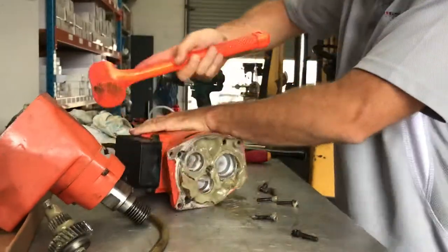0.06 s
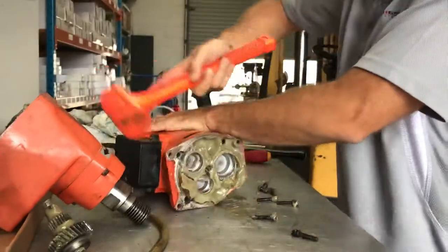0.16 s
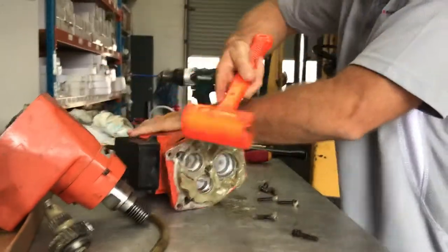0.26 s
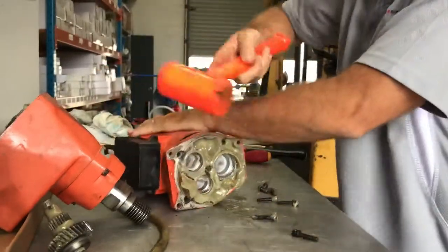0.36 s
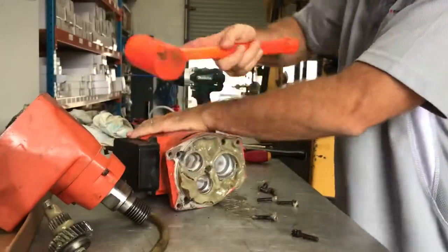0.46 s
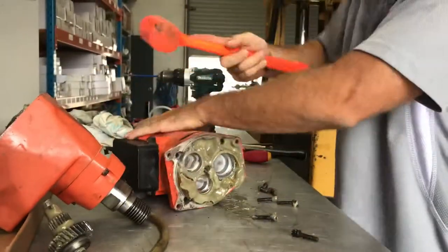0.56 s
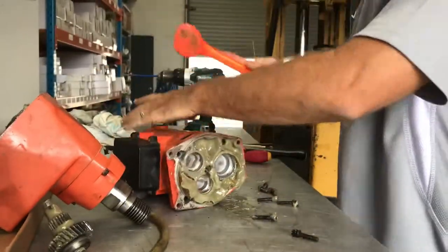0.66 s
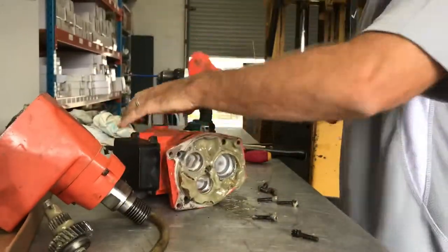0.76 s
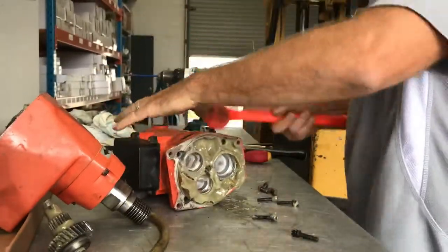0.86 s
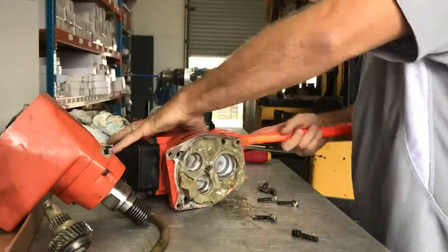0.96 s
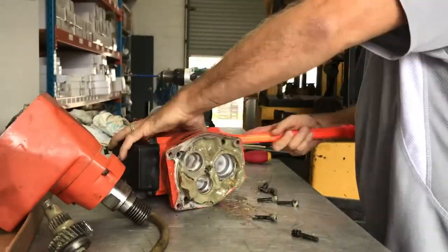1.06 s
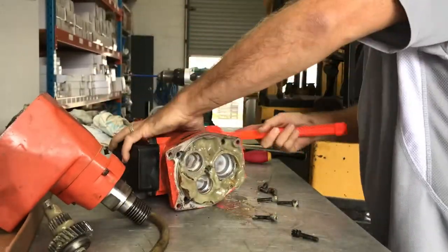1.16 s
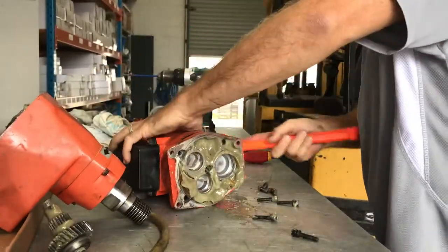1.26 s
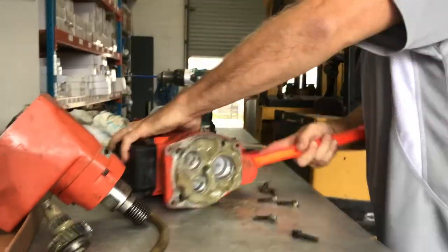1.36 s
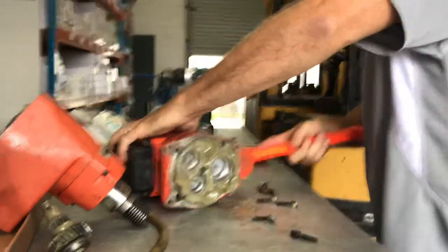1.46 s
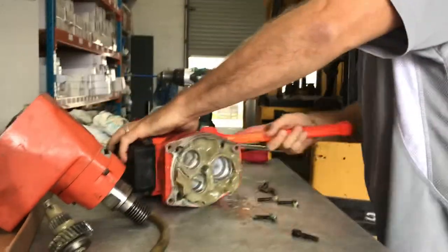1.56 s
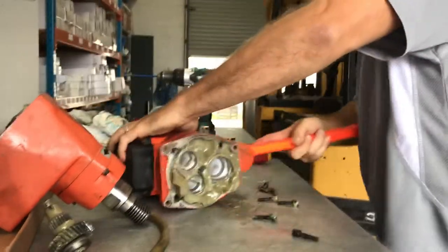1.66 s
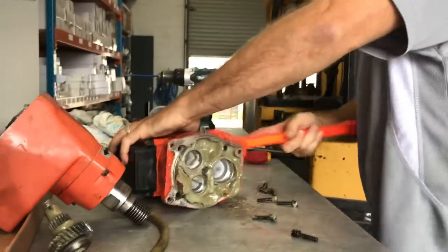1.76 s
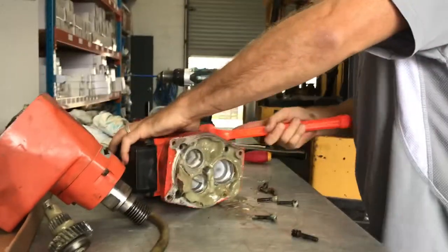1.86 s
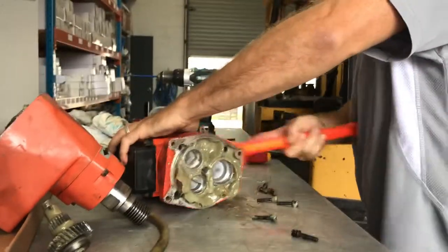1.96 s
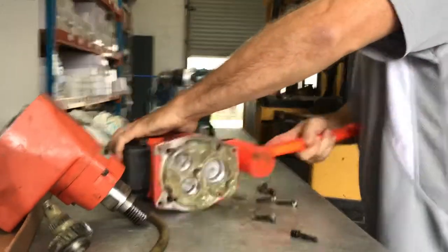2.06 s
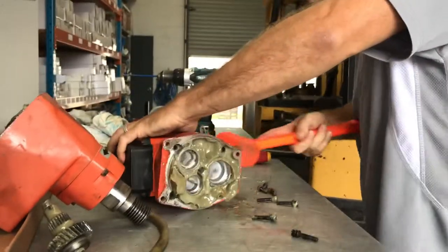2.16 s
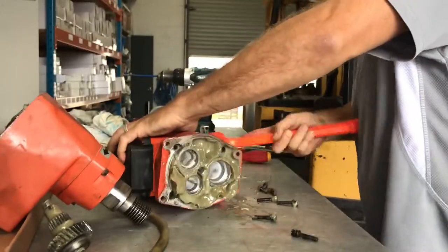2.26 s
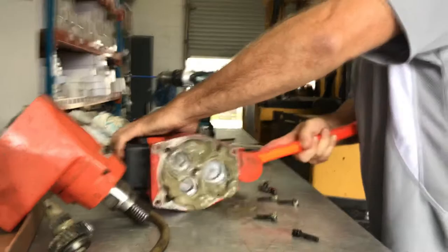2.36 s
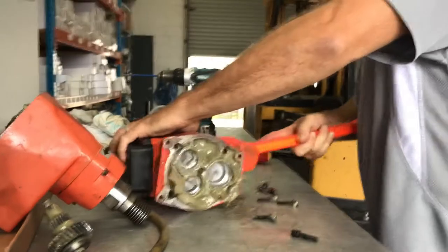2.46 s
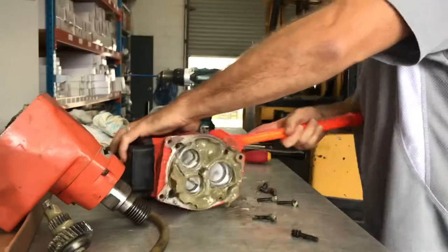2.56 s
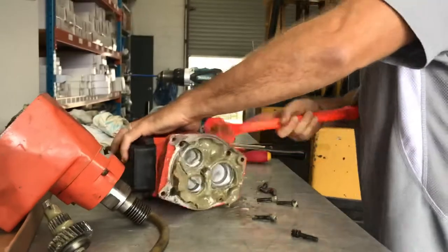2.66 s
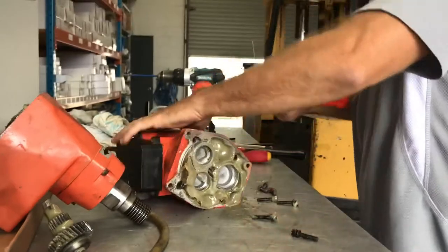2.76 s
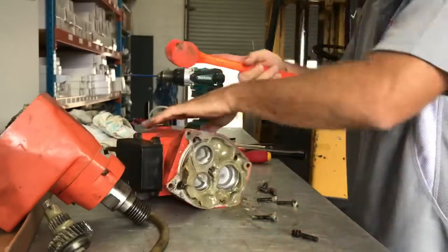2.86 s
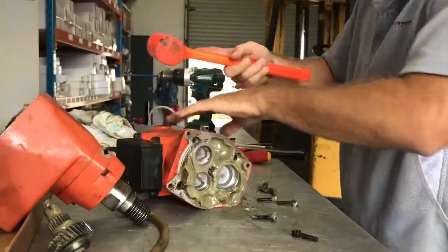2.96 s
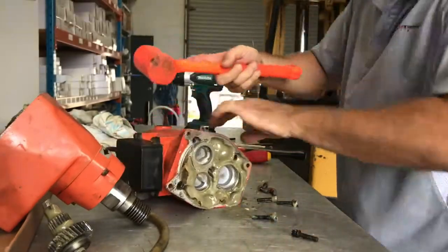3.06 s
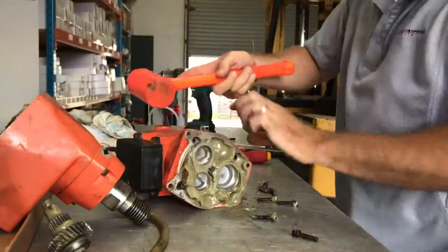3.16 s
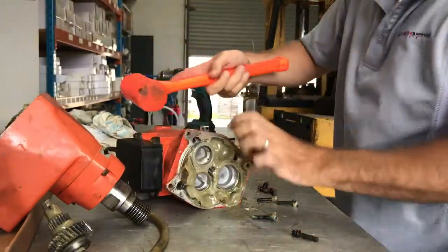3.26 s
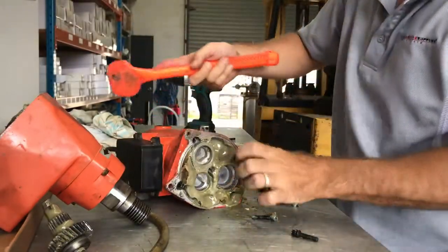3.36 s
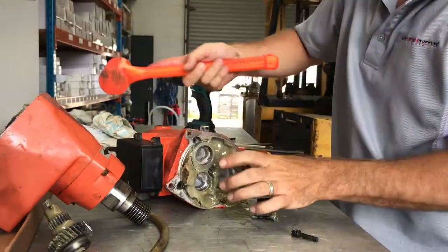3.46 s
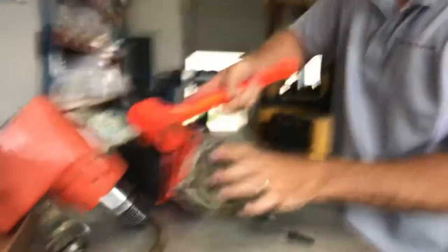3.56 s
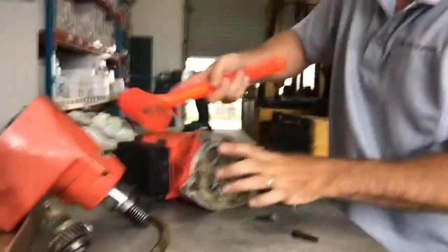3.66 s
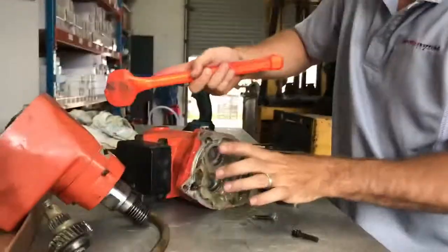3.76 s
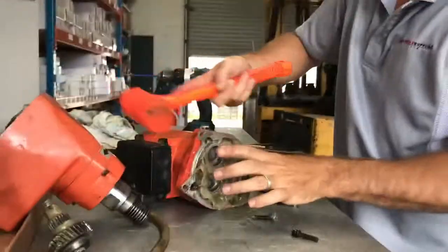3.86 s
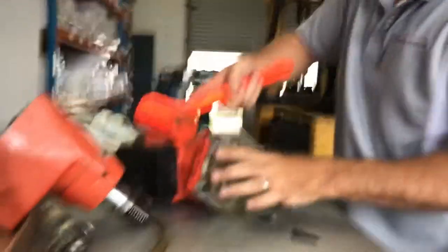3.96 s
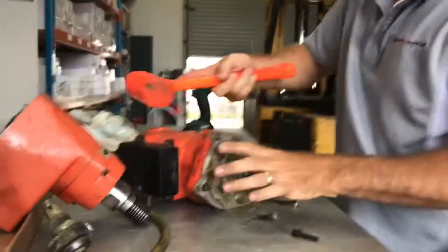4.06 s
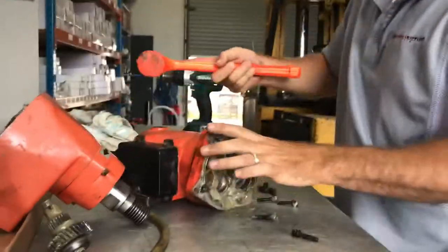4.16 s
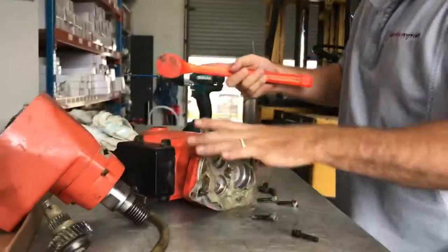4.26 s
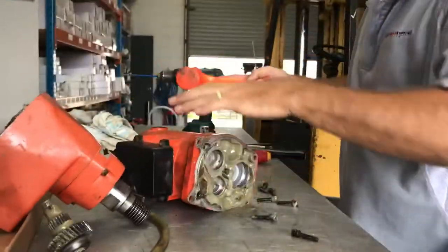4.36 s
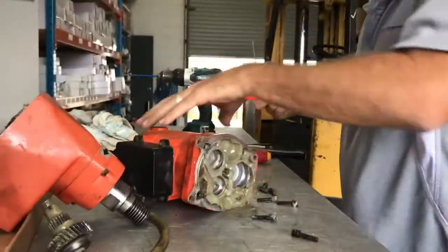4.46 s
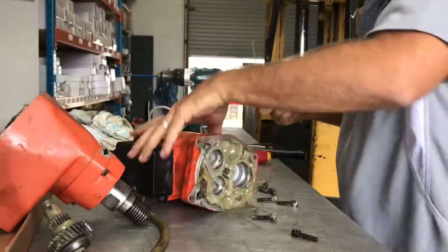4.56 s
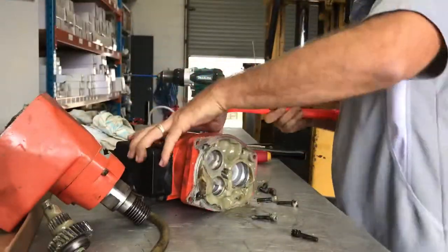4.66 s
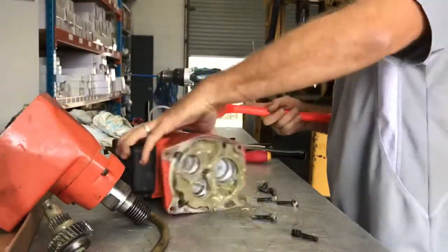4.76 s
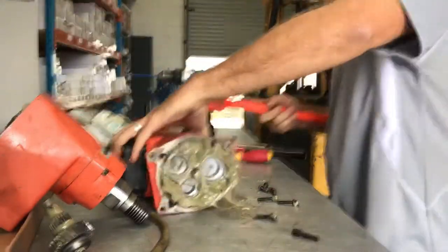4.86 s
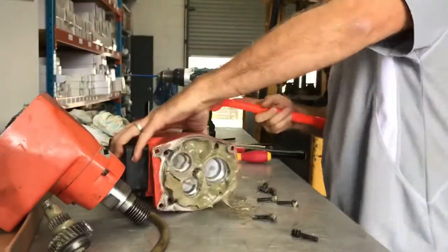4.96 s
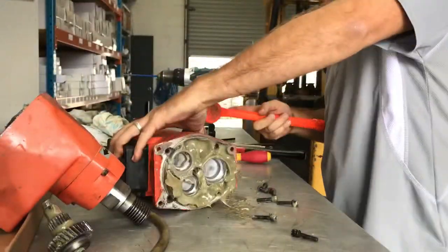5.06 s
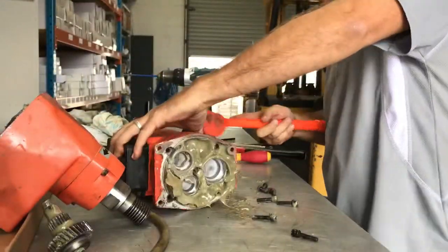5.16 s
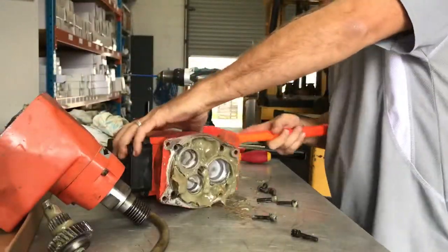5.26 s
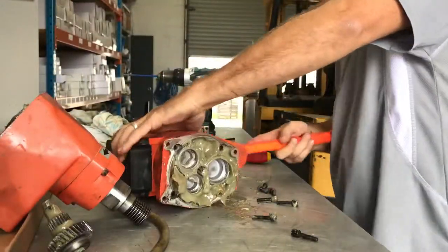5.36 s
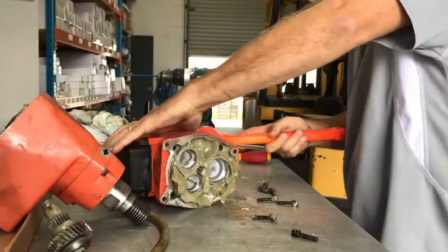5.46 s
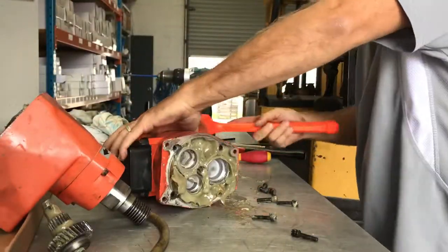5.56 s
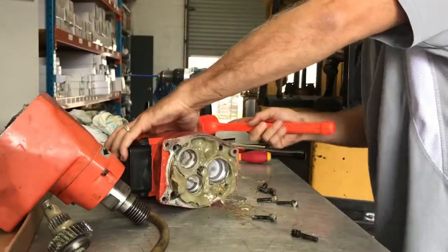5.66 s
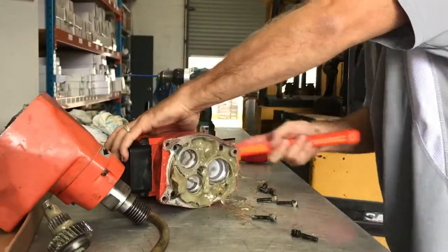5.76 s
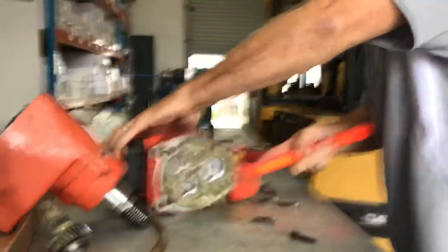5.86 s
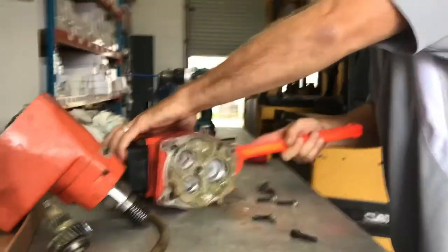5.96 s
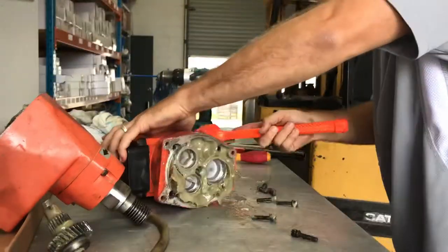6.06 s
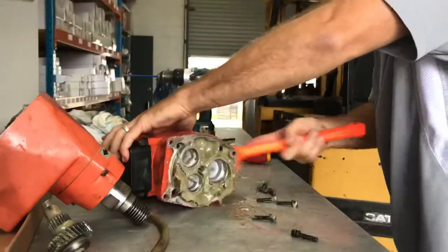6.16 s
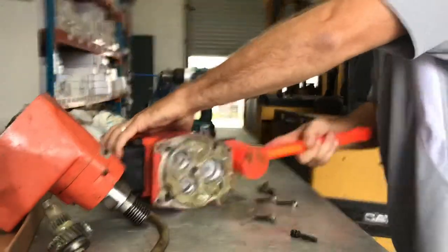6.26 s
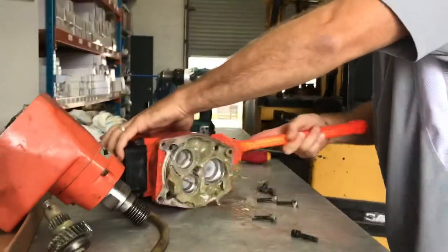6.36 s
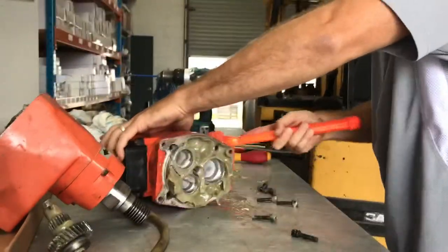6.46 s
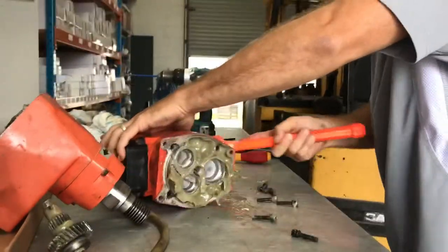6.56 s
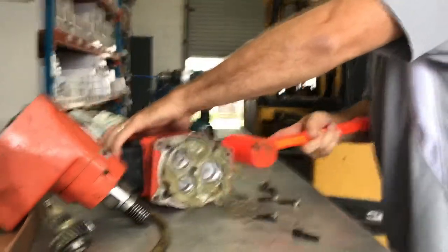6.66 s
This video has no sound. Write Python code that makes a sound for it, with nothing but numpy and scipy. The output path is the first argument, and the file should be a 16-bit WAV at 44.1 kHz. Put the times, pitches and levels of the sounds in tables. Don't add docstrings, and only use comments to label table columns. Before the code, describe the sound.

Heavy dull mallet knocks on a metal casting, each a tight double clack with bench rattle, with hand rubs between and engine drone behind.

```python
import sys
import numpy as np
from scipy import signal
from scipy.fft import rfft, irfft, next_fast_len
from scipy.io import wavfile
from scipy.ndimage import map_coordinates

SR = 44100
rng = np.random.default_rng(int(sys.argv[2]) if len(sys.argv) > 2 else 0)


def attenuation_scalar(level_db):
    decades = np.asarray(level_db, float) / 20
    return 10 ** decades


def put_to_file(sound):
    columns = np.atleast_2d(sound).T
    safe = np.clip(columns, -1, 1)
    whole_steps = np.round(safe * 32767)
    wavfile.write(sys.argv[1], SR, whole_steps.astype(np.int16))


N = 295911
LEAD = SR // 4

THUD, LOW, DULL, MID, HIGH = 400, 667, 885, 1116, 1320
# t/s, knock level/dB, crack level/dB, clatter level/dB, bench level/dB, face ring f/Hz, shot ring f/Hz
BLOWS = [(-.0127, -7.5, -19, -13.5, -18, DULL, DULL), (.2757, -8, -20, -6, -4, DULL, LOW),
         (1.4312, -13.5, -11, -14, -21.5, LOW, LOW), (1.4412, -2, -3, -12.5, -20.5, MID, DULL),
         (1.7748, -4, -1.5, -11, -15, HIGH, MID), (2.0973, -6, -1, -10.5, -10, MID, MID),
         (2.451, -4, -0.5, -14, -11.5, MID, MID), (3.6528, 0, -17.5, -1.5, -4, MID, MID),
         (4.0045, 1, -8.5, -2, -3.5, MID, LOW), (5.9163, -5.5, 1, -11, -7, HIGH, LOW),
         (6.2885, -5, 1.5, -13, -11, HIGH, LOW), (6.683, -8, 3, -12.5, -17, HIGH, LOW),
         (6.696, -5, -9, -12.5, -7.5, MID, LOW)]
# t/s, knock level/dB, clatter level/dB, ring f/Hz
ROCKS = [(.2768, -3, -30, LOW), (.2825, -9, -30, LOW), (.286, -18.5, -20, HIGH), (.291, -21, -17, LOW),
         (1.45, -7, -45, LOW), (1.4665, -4, -38, DULL), (1.7795, -9.5, -30, LOW), (1.7805, -9, -27.5, THUD),
         (1.79, -22.5, -21, LOW), (1.8076, -5, -34, DULL), (2.102, -10.5, -32, THUD),
         (2.111, -12, -16.5, THUD), (2.12, -21, -22.5, MID), (2.455, -5, -21, THUD),
         (2.4574, -2, -12.5, LOW), (2.4616, -11.5, -7, HIGH), (2.473, -16, -30, HIGH),
         (2.4765, -7, -24, DULL), (3.6538, -8, -35, LOW), (3.667, -7.5, -15.5, LOW),
         (3.673, -17, -11, DULL), (3.683, -26, -9.5, HIGH), (3.692, -30, -21, LOW), (4.0058, -8, -35, DULL),
         (4.0183, -14, -13, LOW), (4.024, -22, -16, LOW), (4.0312, -27.5, -6.5, DULL),
         (4.039, -28, -19.5, LOW), (5.933, -31, -4, HIGH), (5.937, -35, -10, HIGH), (5.946, -17, -37, HIGH),
         (6.2956, -5, -16.5, MID), (6.2974, -10, -27, THUD), (6.3005, -14, -24, MID),
         (6.304, -26, -29, LOW), (6.7015, -2, -30, THUD)]
# t/s, knock level/dB, crack level/dB, ring f/Hz
GRAZES = [(.261, -41, -35, MID), (.3195, -45, -38, LOW), (1.4282, -30, -19, MID), (1.7514, -36, -39, HIGH),
          (1.763, -33, -44, MID), (2.077, -32, -23, MID), (2.0814, -18.5, -14.5, HIGH),
          (2.083, -16, -33, THUD), (2.4275, -34, -35, HIGH), (2.44, -29, -45, HIGH),
          (2.444, -27, -39, HIGH), (5.8958, -21.5, -24, MID), (5.899, -18.5, -10, HIGH),
          (5.908, -16.5, -15, HIGH), (6.2867, -13.5, -16, MID), (6.4205, -26, -30, LOW),
          (6.6798, -17, -17, HIGH)]
# t/s, knock level/dB, ring f/Hz, crack level/dB, clatter level/dB, bench level/dB
SET_DOWN = [
    (4.9034, -25, LOW, -39, -2.5, -14),
    (4.92, -23, LOW, -22, -33, -11),
]
# start t/s, end t/s
SIDE_BLOW_SPANS = [
    (1, 3),
    (5.5, 7),
]
SHOT_KNOCK_DB = {"top": -7.5, "side": 1}
# f/Hz, bandwidth/Hz, level/dB
HOUSING_MODES = [(1181, 264, 0.5), (1610, 480, -2.5), (1887, 142, 3.5), (2070, 307, -2.5), (2574, 200, -3),
                 (2960, 250, -4.5), (3480, 1000, -10.5)]
# f/Hz, bandwidth/Hz, level/dB
BENCH_DOWN_MODES = [(130, 17.8, -2), (217.6, 30.3, -5), (271.7, 34.6, -3), (327, 76, -12.5),
                    (589, 73, -9.5)]
# f/Hz, bandwidth/Hz, level/dB
BENCH_SIDE_MODES = [(175.4, 62, -3), (216.3, 36, -3), (297, 58, -5), (400, 39, 0.5), (670.7, 33, 0.5)]
# f/Hz, level/dB per Hz
SHEET_SPECTRUM = [(300, -11.5), (480, -12), (680, 5), (900, -7), (1200, -2), (1600, -24.5), (2400, -26),
                  (4000, -50)]
# f/Hz, level/dB per Hz
CLATTER_SPECTRUM = [(880, 4), (1500, -13.5), (2240, -5), (4930, -3), (5900, 0), (8450, -6), (10500, -16.5),
                    (11800, -13), (15100, -18.5), (15900, -30.5), (16400, -53)]
# f/Hz, level/dB per Hz
TOP_SPECTRUM = [(7000, -34), (9500, -3), (11000, -4), (13000, 7), (15500, 0), (16000, -18.5), (16400, -120)]
# f/Hz, decay time T60/s
SHOP_T60 = [(100, 0.79), (500, 0.29), (1500, 0.48), (2900, 0.48), (4500, 0.32), (8000, 0.3), (15000, 0.32)]
# t/s, peak level/dB, f/Hz
SWAYS = [(0.283, -23, 66), (1.444, -20, 68.25), (1.784, -24, 53.6), (2.112, -28, 66.6),
         (2.464, -22.5, 71.8), (3.235, -26, 80.7), (3.659, -13.5, 65.5), (4.007, -14.5, 67.3),
         (4.918, -22, 62.2), (5.473, -26.5, 77.2), (5.932, -17, 67), (6.295, -20, 68.8), (6.69, -21, 64)]
# t/s, peak level/dB, length/s, lower rattle level/dB
SHOT_SLIDES = [(0.184, -36, 0.0322, -18), (0.348, -48, 0.025, -5.5), (0.775, -52, 0.045, -16),
               (1.054, -50, 0.05, -20), (1.305, -54, 0.0385, -12), (1.6782, -39, 0.029, -20),
               (1.993, -41.5, 0.033, -15), (2.36, -41, 0.0413, -17), (3.2853, -63, 0.027, -5),
               (3.518, -50, 0.038, -23), (3.8832, -37.5, 0.024, -24), (4.2665, -44, 0.039, -18),
               (4.858, -52.5, 0.03, -14), (5.787, -57, 0.047, -8), (6.174, -40.5, 0.061, -15),
               (6.581, -41.5, 0.038, -14.5)]
# f/Hz, level/dB per Hz
FINE_SHOT_SPECTRUM = [(5880, -48), (10000, -17.5), (10300, -25.5), (14100, -5), (15700, -16.5),
                      (16400, -25.5)]
# t/s, peak level/dB
TICKS = [(1.8413, -30), (2.7185, -39), (2.7334, -46), (2.7576, -39), (4.764, -38), (4.7965, -38),
         (4.815, -42), (4.8444, -35), (4.863, -38.5), (5.1564, -36), (5.31, -47), (5.328, -55.5),
         (5.384, -56), (5.47, -43)]
# t/s, length/s, level/dB
RUBS = [
    (.33, 0.055, -66),
    (0.617, 0.11, -65),
    (2.76, 0.14, -56),
    (3.494, 0.13, -58),
    (4.352, 0.076, -59),
    (4.593, 0.075, -59),
    (4.765, 0.23, -47),
    (5.305, 0.15, -56.5),
]
# f/Hz, level/dB per Hz
RUB_SPECTRUM = [(400, -27), (1000, 8), (3000, -6.5), (8000, -10.5), (11000, -16), (15500, -19),
                (16200, -120)]
# t/s, firing f/Hz, level/dB
ENGINE = [
    (0, 80.04, -31),
    (.5, 81.68, -33),
    (.9, 84.85, -33),
    (1.3, 87.24, -33),
    (1.5, 92, -40),
    (2, 97.5, -38),
    (2.5, 96, -47),
    (3.1, 99, -45.5),
    (3.35, 99, -58),
    (6.71, 98, -62),
]
# multiple of firing f, level/dB
ENGINE_ORDERS = [(0.99, 0), (4 / 3, -14.5), (1.55, -15), (0.74, -15)]
# t/s, shaft f/Hz, level/dB
TRUCK = [
    (0, 37.1, -77),
    (2.45, 37, -62),
    (2.7, 37.97, -50.5),
    (2.95, 40.04, -48),
    (3.25, 42.5, -46),
    (3.6, 45.46, -42),
    (4.1, 46.48, -45),
    (4.5, 46.55, -47),
    (4.9, 46.03, -63),
    (6.71, 46, -83.5),
]
# multiple of shaft f, level/dB
TRUCK_ORDERS = [(3, 0), (3.6, -7), (4, -6), (2.5, -6)]
# t/s, f/Hz, level/dB
HUM = [
    (0, 54.52, -35.5),
    (1.5, 56, -57),
    (2.8, 54.05, -38.5),
    (3.2, 56.26, -43),
    (3.5, 57.54, -55),
    (6.71, 55.8, -54),
]
# t/s, level/dB
WHINE_LEVEL = [(0, -60), (.15, -58), (.5, -57.5), (.7, -54), (1, -55.5), (1.4, -61), (1.6, -69), (2.4, -74),
               (3.1, -87), (6.71, -120)]
# multiple, level/dB, level change while coasting/dB per s
WHINE_ORDERS = [(.5, -8, -11), (1, 0, 0), (1.5, -21, 5.5), (2, -14, -1), (3, -31, 6)]
# f/Hz, start t/s, end t/s, level/dB
FAN_TONES = [
    (1120, 0, 6.71, -69),
    (1168, 0, 6.71, -69),
    (1362, 4.6, 6.3, -65),
    (4888, 3.35, 3.7, -72),
    (4199, 5, 5.8, -82),
]
# t/s, level/dB
TRAFFIC = [(0.0, -32.5), (0.49, -43), (1.23, -35), (2.34, -40), (2.75, -38), (3.96, -38.5), (4.67, -42),
           (4.88, -41), (5.12, -39), (5.49, -41), (6.09, -36.5), (6.71, -39)]
# t/s, level/dB
BUSTLE = [(0.0, -57), (1.12, -59), (1.42, -61), (2.04, -55.5), (2.24, -60), (2.6, -51.5), (2.86, -63),
          (3.36, -62), (3.91, -57), (4.43, -61), (4.82, -61), (4.97, -53.5), (5.64, -64.5), (5.9, -63),
          (6.09, -59), (6.71, -58.5)]
# f/Hz, level/dB per Hz
RUMBLE_SPECTRUM = [(15, -34.5), (25, -25), (49, 5), (65, 8.5), (81, -0.5), (120, -4.5), (160, -46),
                   (260, -120)]
# f/Hz, level/dB per Hz
DRONE_SPECTRUM = [(50, -26), (85, 3.5), (107, -5), (167, -10), (243, -21), (317, -26.5), (420, -24.5),
                  (550, -48.5), (920, -120)]
# f/Hz, level/dB per Hz
NOISE_SPECTRUM = [(180, 2.5), (300, 0.5), (476, -9.5), (565, -6.5), (689, -6.5), (747, -9.5), (1060, -8.5),
                  (1130, -13), (1320, -11), (1480, -16), (2600, -26.5), (3380, -30), (5720, -120)]
# f/Hz, level/dB per Hz
HISS_SPECTRUM = [(1000, -29.5), (1700, -4), (1910, -8.5), (2040, -5), (3870, -7.5), (4150, -9),
                 (4470, -9.5), (5620, -12), (10500, -21.5), (13600, -39), (22000, -120)]

SHOT_CRACK_DB, FACE_CLATTER_DB = -6.5, -7
SHOT_LAG_S, LAG_S_PER_DB, LEAST_LAG_S = 0.005596, .0004, 0.00329
ROCK_CRACK_DB, ROCK_BENCH_DB, ROCK_FADE_DB_PER_S = -4, -3, 147
GRAZE_CLATTER_DB, GRAZE_BENCH_DB = -7, 0.5
RING_SCATTER = .01
STRIKE_DB, STRIKE_S = 6, .0003
SWAY_T60_S, TICK_S = 0.21, .004
WHINE_HZ, WHINE_DROP_HZ, COAST_S, COAST_BEND = 4325, 770, .56, 1.45
FAR_T60_S, FAR_WET_DB = 1.3, -1.5
RUMBLE_DB, DRONE_DB = -2, -5.5
NOISE_DB, HISS_DB, TOP_DB = 11, 0.04, -14
NOISE_FOLLOWS, TOP_FOLLOWS = 0.41, 0.94


def unit(x):
    return x / np.sqrt(np.mean(x ** 2) + 1e-20)


def along(points, hz):
    f, v = np.transpose(points)
    return np.interp(np.log(hz + 1), np.log(f + 1), v)


def curves(rows):
    s, *cols = np.transpose(rows)
    return [np.interp(np.arange(N) / SR, s, c) for c in cols]


def wobble(rate):
    knots = rng.standard_normal(int(N * rate / SR) + 4)
    return map_coordinates(knots, [np.arange(N) * rate / SR])


def filtered(x, response):
    m = next_fast_len(len(x) + SR // 2)
    return irfft(rfft(x, m) * response(np.fft.rfftfreq(m, 1 / SR)), m)[:len(x)]


def coloured(spectrum, size=N):
    return unit(filtered(rng.standard_normal(size), lambda hz: attenuation_scalar(along(spectrum, hz))))


def modes(peaks):
    def response(f):
        total = 0
        for k, (centre, width, db) in enumerate(peaks):
            damping = 1j * f * width
            total = total + (-1) ** k * attenuation_scalar(db) * damping / (centre * centre - f * f + damping)
        return total
    return response


def add(track, s, sound):
    part = track[LEAD + round(s * SR):][:len(sound)]
    part += sound[:len(part)]


def swell(t, length):
    return (1 - np.exp(-t / (0.036 * length))) * np.exp(-t / length)


def hump(t, length, power):
    return np.sin(np.pi * np.clip(t / length, 0, 1)) ** power


def is_sideways(s):
    return any(a < s < b for a, b in SIDE_BLOW_SPANS)


def contacts():
    rows = list(SET_DOWN)
    for s, db, crack_db, clatter_db, bench_db, face_hz, shot_hz in BLOWS:
        rows.append((s, db, face_hz, crack_db, clatter_db + FACE_CLATTER_DB, bench_db))
        shot_s = s + max(LEAST_LAG_S, SHOT_LAG_S + LAG_S_PER_DB * db)
        shot_db = db + SHOT_KNOCK_DB["side" if is_sideways(s) else "top"]
        rows.append((shot_s, shot_db, shot_hz, crack_db + SHOT_CRACK_DB, clatter_db, bench_db))
    for s, db, clatter_db, hz in ROCKS:
        blow = max(row for row in BLOWS if row[0] < s)
        bench_db = blow[4] + ROCK_BENCH_DB - ROCK_FADE_DB_PER_S * (s - blow[0])
        rows.append((s, db, hz, (db + clatter_db) / 2 + ROCK_CRACK_DB, clatter_db, bench_db))
    for s, db, crack_db, hz in GRAZES:
        rows.append((s, db, hz, crack_db, crack_db + GRAZE_CLATTER_DB, db + GRAZE_BENCH_DB))
    return rows


def blows():
    size = N + LEAD
    ring, knock, chatter, snap, bright, slam, down, side = np.zeros((8, size))
    t = np.arange(SR // 20) / SR
    for s, db, hz, crack_db, clatter_db, bench_db in contacts():
        hz = hz * (1 + RING_SCATTER * rng.standard_normal())
        held = hump(t, 0.0047, 0.55) + 0.3 * swell(t, 0.0035)
        add(ring, s, attenuation_scalar(db - 5.5) * held * np.sin(2 * np.pi * hz * t))
        add(knock, s, attenuation_scalar(db - 5.5) * swell(t, 0.0027))
        add(slam, s, attenuation_scalar(clatter_db - 35.0) * swell(t, 0.012))
        add(chatter, s, attenuation_scalar(crack_db + 6.5) * swell(t, 0.0034))
        add(snap, s, attenuation_scalar(crack_db + STRIKE_DB) * hump(t, STRIKE_S, 1))
        add(bright, s, attenuation_scalar(clatter_db - 5) * swell(t, 0.0027))
        push = side if is_sideways(s) else down
        add(push, s, attenuation_scalar(bench_db + 13.0) * hump(t, 0.0012, 1))
    casting = filtered(chatter * rng.standard_normal(size) + snap, modes(HOUSING_MODES))
    clinks = attenuation_scalar(2.7 * rng.standard_normal(size // 30 + 1)).repeat(30)[:size]
    steel = bright * clinks * coloured(CLATTER_SPECTRUM, size=size)
    bench = filtered(down, modes(BENCH_DOWN_MODES)) + filtered(side, modes(BENCH_SIDE_MODES))
    rest = casting + steel + bench + slam * coloured(TOP_SPECTRUM, size=size)
    sheet = knock * coloured(SHEET_SPECTRUM, size=size)
    room = workshop(attenuation_scalar(-11) * ring + sheet + rest)
    return (ring + rest + attenuation_scalar(-9.5) * room)[LEAD:]


def workshop(x):
    hz, t, z = signal.stft(rng.standard_normal((40, SR // 3)), SR, nperseg=256)
    late = attenuation_scalar(-60 * t / along(SHOP_T60, hz)[:, None])
    scatter = attenuation_scalar(3.5 - 60 * t / 0.061)
    tails = signal.istft(z * (late + scatter), SR, nperseg=256)[1]
    tails = tails * (1 - np.exp(-np.arange(tails.shape[1]) / SR / 0.0015))
    wet = np.zeros(len(x) + SR)
    step = SR // 300
    for k, start in enumerate(range(0, len(x), step)):
        part, tail = x[start:start + step], tails[k % len(tails)]
        if np.abs(part).max() > 2e-3:
            echo = signal.fftconvolve(part, tail / np.linalg.norm(tail))
            wet[start:start + len(echo)] += echo
    return wet[:len(x)]


def sways():
    track, t = np.zeros(N + LEAD), np.arange(SR // 2) / SR
    for s, db, hz in SWAYS:
        envelope = attenuation_scalar(db + 11.5 - 60 * t / SWAY_T60_S) * (1 - np.exp(-t / 0.023))
        add(track, s, envelope * np.sin(2 * np.pi * hz * t))
    return track[LEAD:]


def grains():
    return attenuation_scalar(2.5 * rng.standard_normal(N // 20 + 1)).repeat(20)[:N]


def shot():
    fine, coarse, ticks = np.zeros((3, N + LEAD))
    t = np.arange(SR // 4) / SR
    for s, db, length, low_db in SHOT_SLIDES:
        pour = hump(t, 1.6 * length, 1 / 3) * np.exp(-t / 0.044)
        add(fine, s - .006, attenuation_scalar(db - 10.5) * pour)
        add(coarse, s + 0.0083, attenuation_scalar(db + low_db + 1.5) * pour)
    for s, db in TICKS:
        add(ticks, s, attenuation_scalar(db - 13.5) * swell(t, TICK_S))
    low = coloured([(2500, -27.5), (4500, 7.5), (9500, 6.5), (12000, -37.5), (16000, -120)])
    click = coloured([(3000, -40.5), (7000, 0.5), (10000, 0), (14000, 3.5), (15800, 6.5), (16400, -120)])
    hiss = fine[LEAD:] * grains() * coloured(FINE_SHOT_SPECTRUM)
    rattle = coarse[LEAD:] * grains() * low
    return hiss + rattle + ticks[LEAD:] * click


def rubs():
    level, t = np.zeros(N + LEAD), np.arange(SR // 2) / SR
    for s, length, db in RUBS:
        add(level, s, attenuation_scalar(db) * hump(t, length, 0.53))
    return level[LEAD:] * attenuation_scalar(1.5 * wobble(84)) * coloured(RUB_SPECTRUM)


def machine(rows, orders, drift, drift_rate, flutter_db, flutter_rate):
    hz, db = curves(rows)
    turn = 2 * np.pi * np.cumsum(hz * (1 + drift * wobble(drift_rate))) / SR
    lines = sum(attenuation_scalar(level + flutter_db * wobble(flutter_rate)) * np.sin(k * turn) for k, level in orders)
    return np.sqrt(2) * attenuation_scalar(db) * lines


def engines():
    engine = machine(ENGINE, ENGINE_ORDERS, 0.01918, 12, 1.77, 14)
    truck = machine(TRUCK, TRUCK_ORDERS, .015, 11, 3.5, 7)
    hum = machine(HUM, [(0.984, 0.0006)], 0.022, 8, 1.3, 5.6)
    return engine + truck + hum


def whine():
    t = np.arange(N) / SR
    hz = WHINE_HZ + WHINE_DROP_HZ * np.exp(-(t / COAST_S) ** COAST_BEND)
    coasting = np.transpose([t, hz, *curves(WHINE_LEVEL)])
    orders = [(k, db + change * np.minimum(t, 1.5)) for k, db, change in WHINE_ORDERS]
    return far(machine(coasting, orders, .009, 400, 3.5, 90))


def far(x):
    t = np.arange(SR // 2) / SR
    tail = rng.standard_normal(len(t)) * attenuation_scalar(-60 * t / FAR_T60_S)
    return x + attenuation_scalar(FAR_WET_DB) * signal.fftconvolve(x, tail / np.linalg.norm(tail))[:N]


def fans():
    total = np.zeros(N)
    for hz, a, b, db in FAN_TONES:
        rows = [(a - .2, hz, db - 30), (a, hz, db), (b, hz, db), (b + .2, hz, db - 40)]
        total += machine(rows, [(1, 0)], .003, 90, 2, 25)
    return total


def background():
    (street_db,), (shop_db,) = curves(TRAFFIC), curves(BUSTLE)
    calm_db = shop_db.mean()
    swing_db = shop_db - calm_db
    rumble = attenuation_scalar(street_db + RUMBLE_DB + 1.9 * wobble(2.6)) * coloured(RUMBLE_SPECTRUM)
    drone = attenuation_scalar(street_db + DRONE_DB + 2.2 * wobble(8.8)) * coloured(DRONE_SPECTRUM)
    noise_db = calm_db + NOISE_FOLLOWS * swing_db + NOISE_DB + 1.5 * wobble(9)
    noise = attenuation_scalar(noise_db) * coloured(NOISE_SPECTRUM)
    stir = .9 * wobble(6.8)
    hiss = attenuation_scalar(shop_db + HISS_DB + stir) * coloured(HISS_SPECTRUM)
    top_db = calm_db + TOP_FOLLOWS * swing_db + TOP_DB + 1.5 * wobble(3)
    top = attenuation_scalar(top_db + stir) * coloured(TOP_SPECTRUM)
    return rumble + drone + noise + hiss + top


def scene():
    near = blows() + sways() + shot() + rubs()
    machines = engines() + whine() + fans()
    return (near + machines + background())[None]


def top_cut(x):
    return signal.sosfilt(signal.butter(12, 16500, fs=SR, output="sos"), x)


def record(dry):
    def band(hz):
        return 1 / np.sqrt((1 + (hz / 15780) ** 360) * (1 + (40 / (hz + 1)) ** 8))
    x = filtered(dry[0], band)[None]
    x = x / (1 + np.abs(x) ** 6) ** (1 / 6)
    return top_cut(x)


dry = scene()
out = record(dry)
put_to_file(out)
```